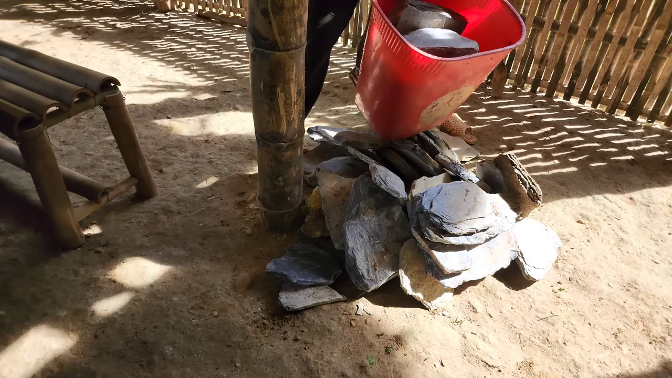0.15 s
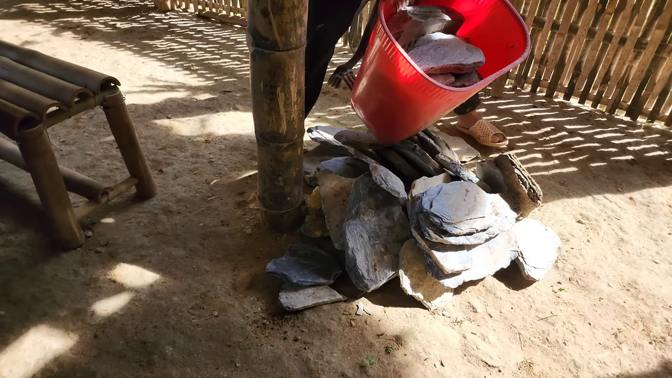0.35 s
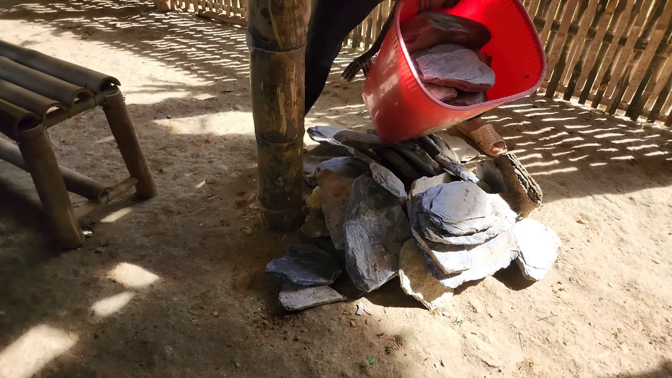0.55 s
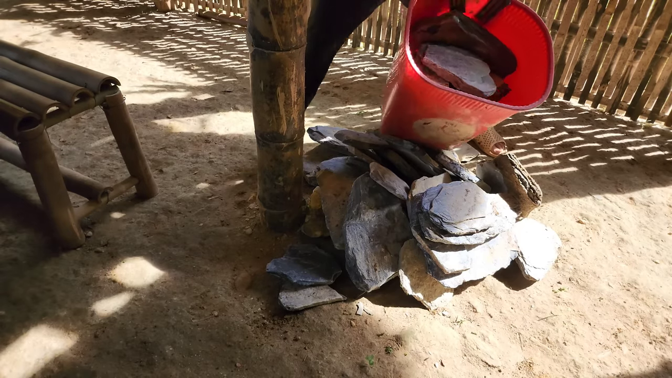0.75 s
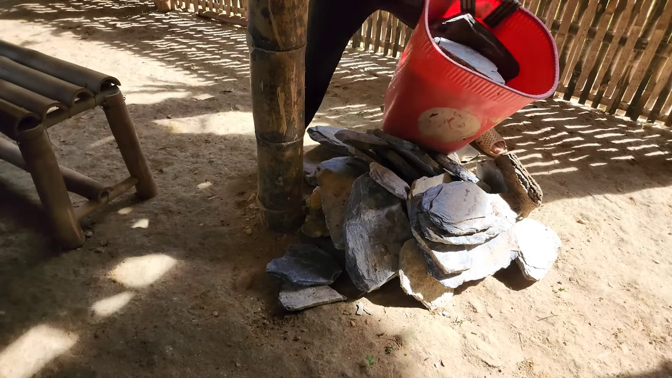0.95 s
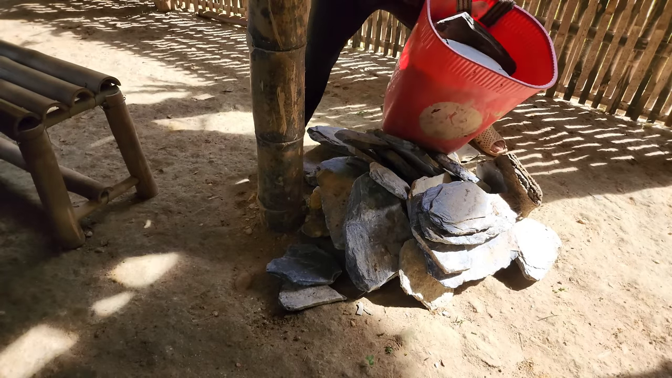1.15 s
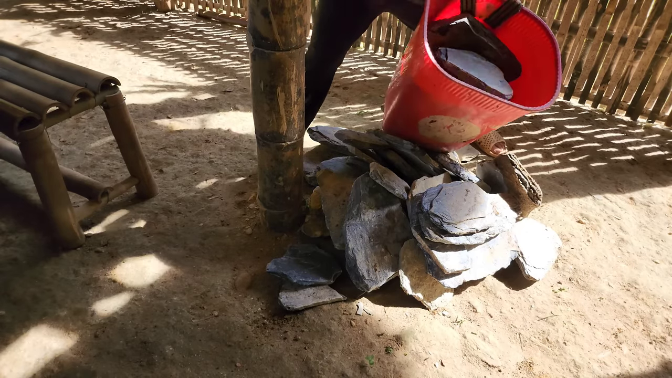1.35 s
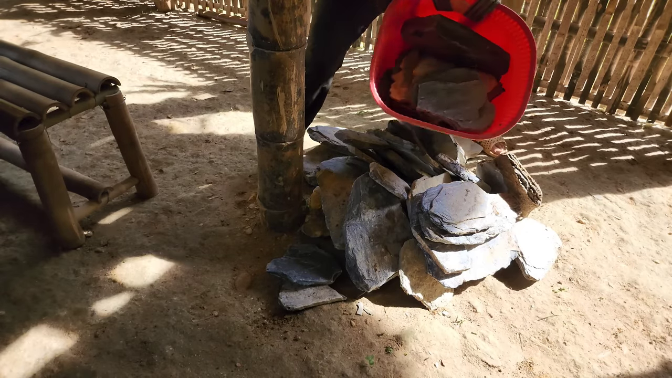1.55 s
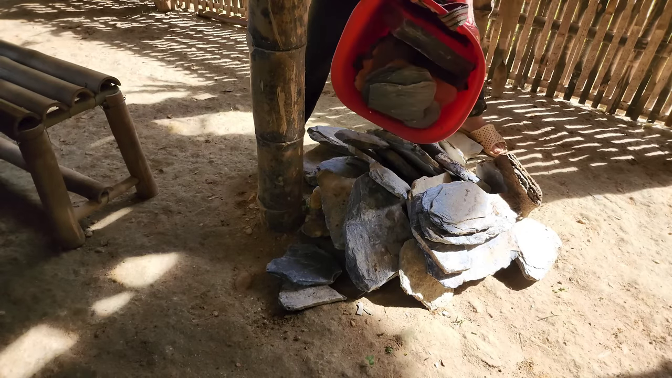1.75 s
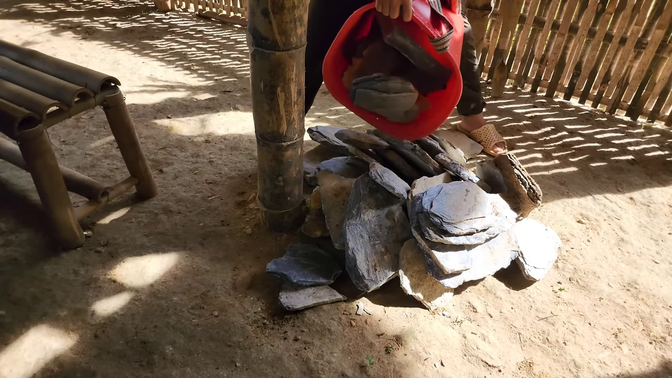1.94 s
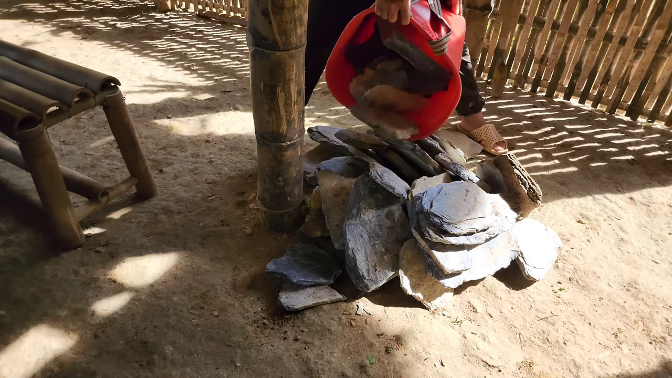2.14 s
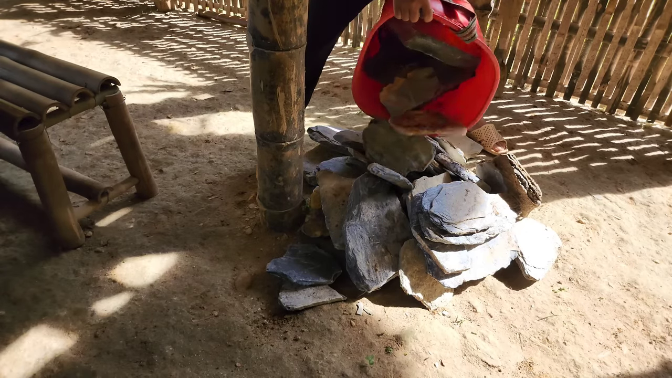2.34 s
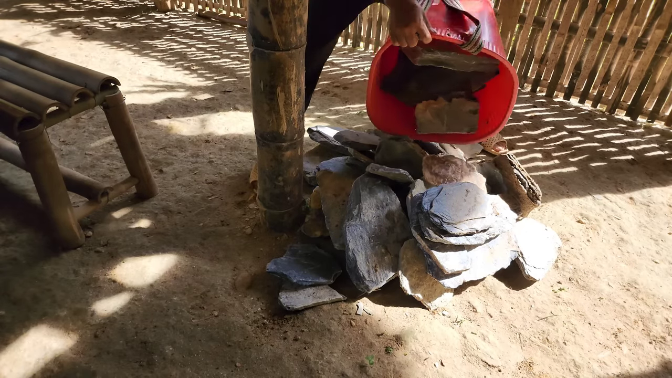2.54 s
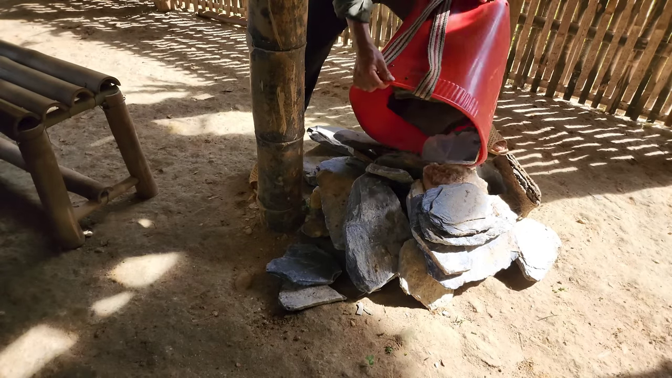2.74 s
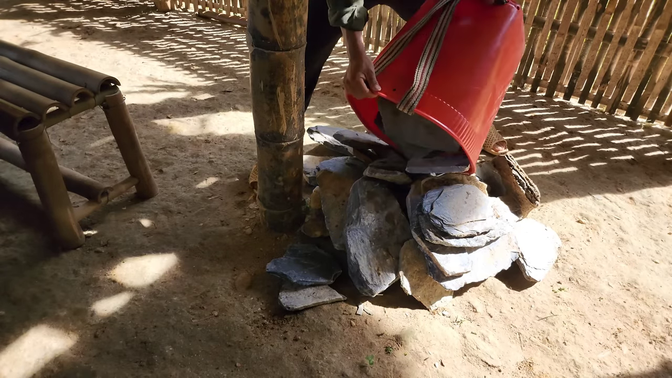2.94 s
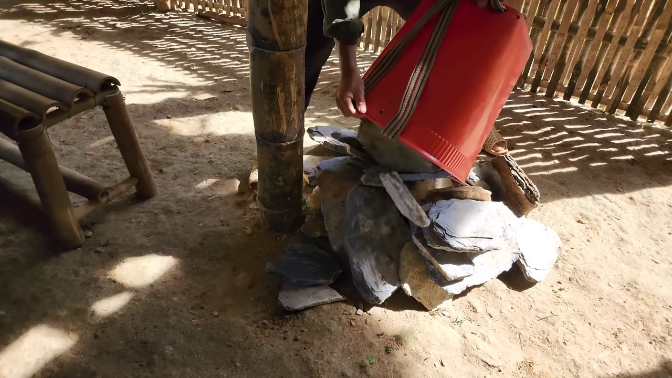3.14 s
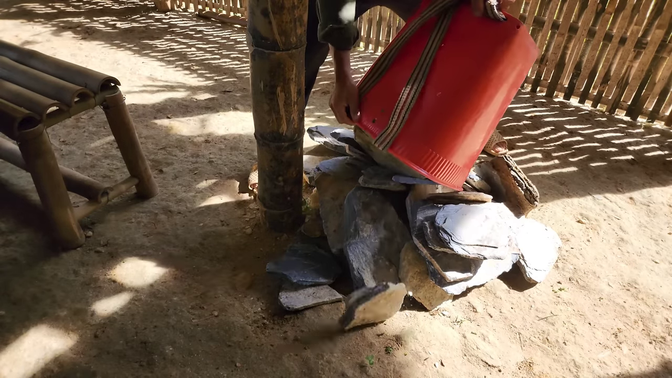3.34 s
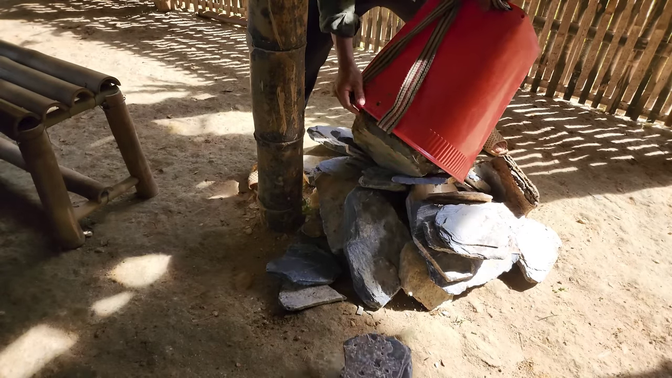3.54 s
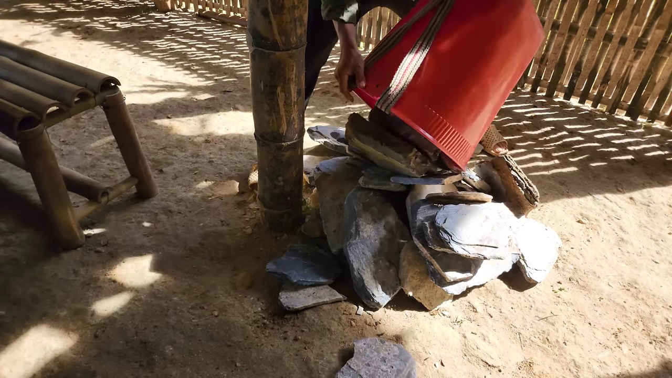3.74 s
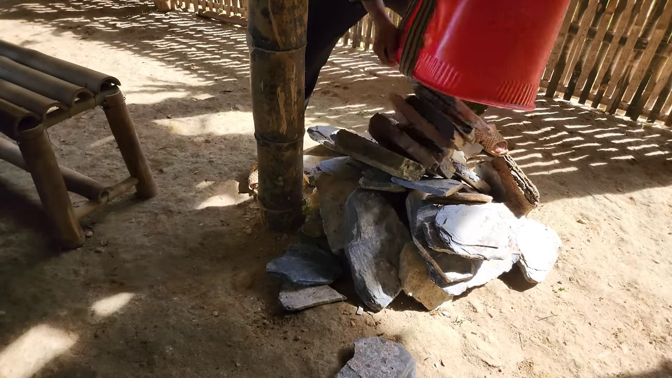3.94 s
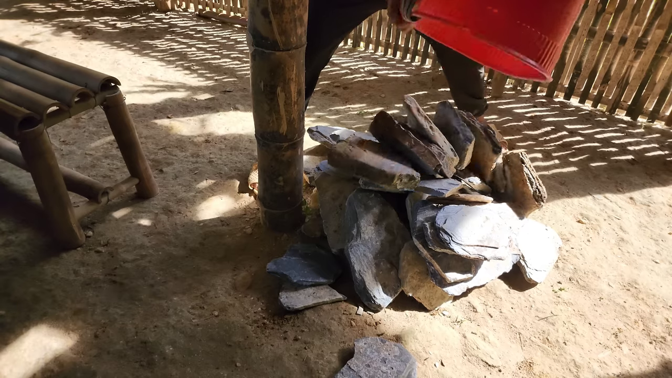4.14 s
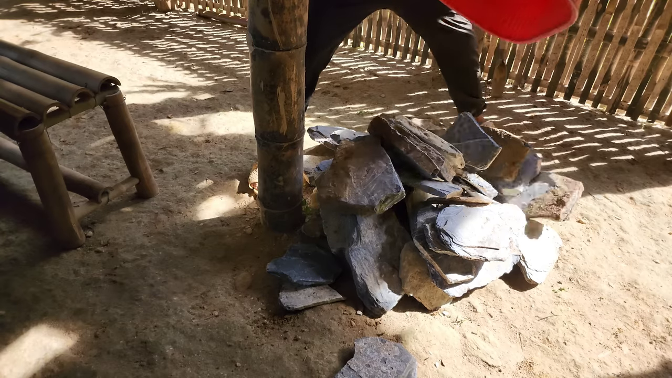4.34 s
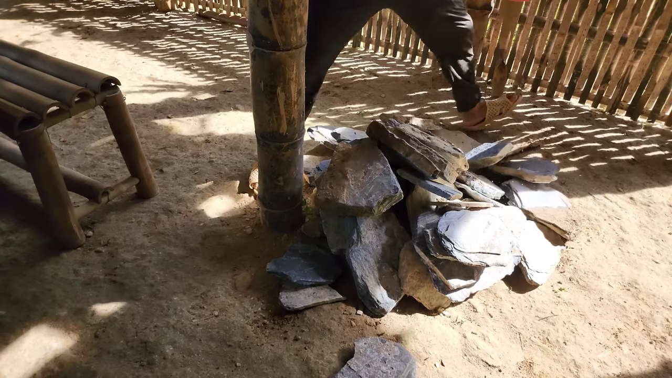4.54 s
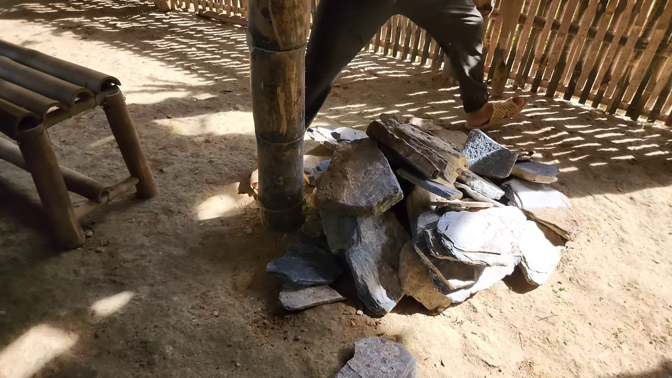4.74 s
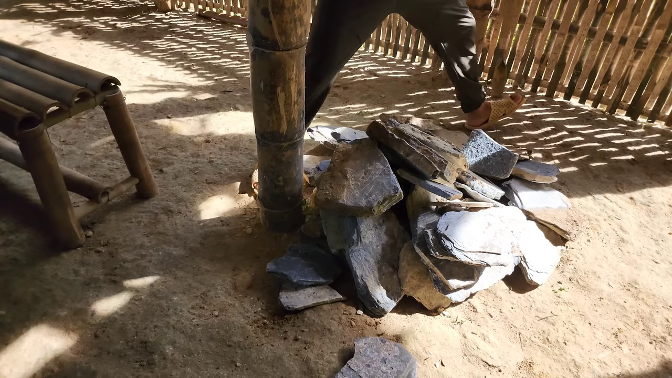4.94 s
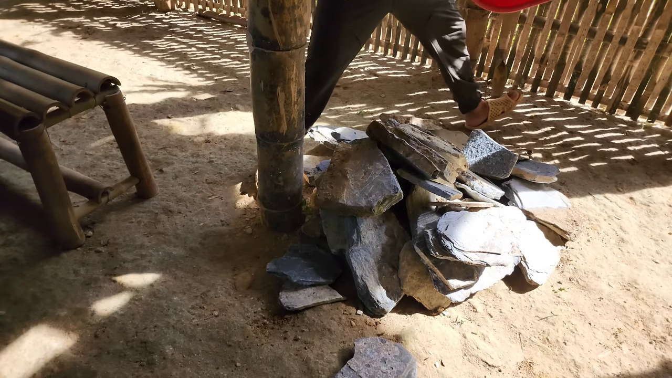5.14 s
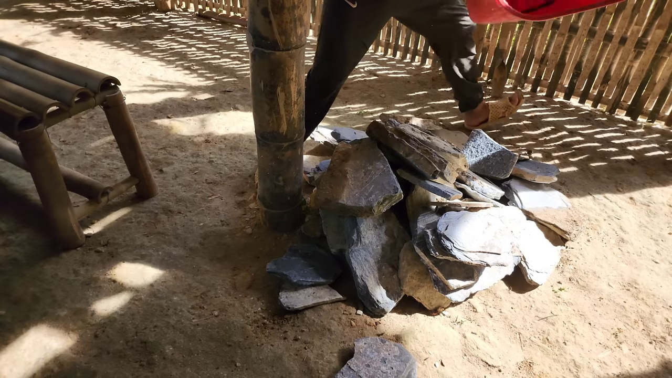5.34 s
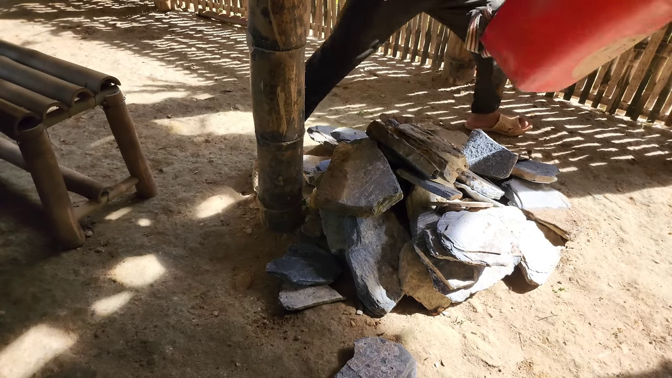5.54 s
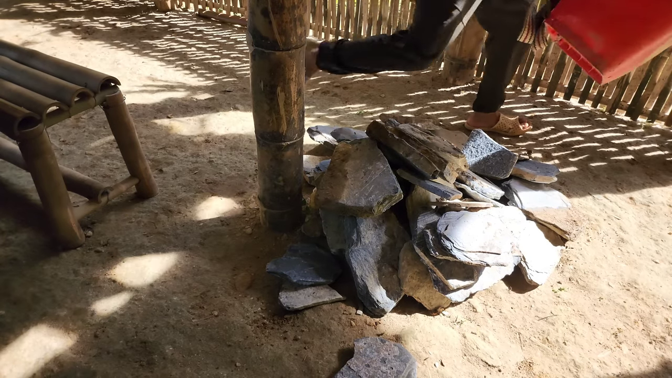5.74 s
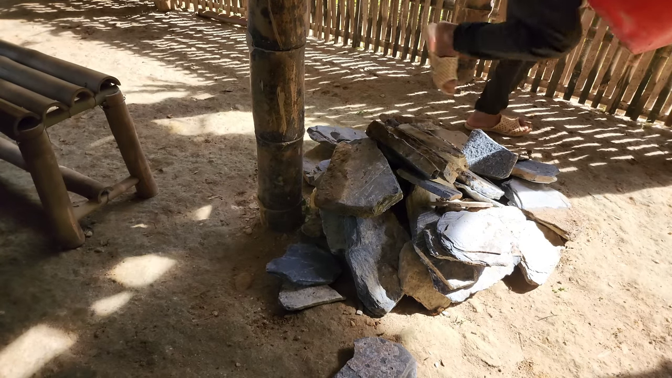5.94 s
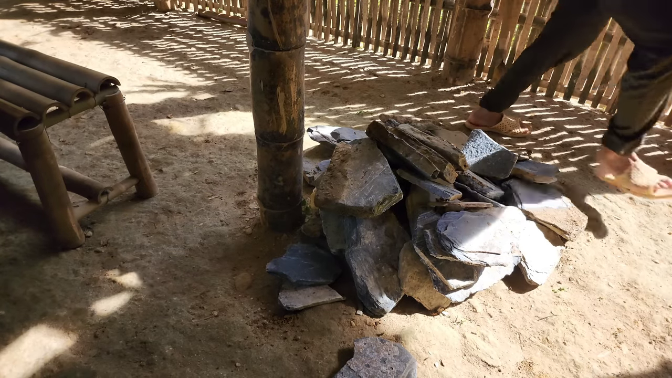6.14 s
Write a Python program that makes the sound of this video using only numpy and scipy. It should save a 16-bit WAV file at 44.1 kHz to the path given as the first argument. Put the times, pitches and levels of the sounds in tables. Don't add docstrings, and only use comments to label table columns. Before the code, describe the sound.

Flat stones shift, then tumble clattering from a booming plastic bucket onto a stone pile in a sandy yard, ending in faint scuffs.

```python
import sys
import numpy as np
from scipy import signal
from scipy.fft import rfft, irfft, next_fast_len
from scipy.io import wavfile
from scipy.ndimage import uniform_filter1d

SR = 44100
rng = np.random.default_rng(int(sys.argv[2]) if len(sys.argv) > 2 else 0)


def convert_level_to_amplitude(level_db):
    exponent = np.asarray(level_db, float) / 20
    return 10 ** exponent


def transcribe(signal):
    frames = np.atleast_2d(signal).T
    limited = np.clip(frames, -1, 1)
    pcm = np.round(limited * 32767).astype(np.int16)
    wavfile.write(sys.argv[1], SR, pcm)


N = 277006
BUCKET_LIFTED_S = 3.85

# start_s, peak_db, strongest_ring_hz, upper_modes_db, crack_db
SETTLING_BLOWS = [(0.181, -24.5, 730, -5, -18.5), (0.508, -31, 1427, 1, -18.5), (0.552, -23, 870, -20, -52),
                  (0.757, -6.5, 716, 4.5, -27.5), (0.802, -20.5, 960, -22, -44),
                  (0.841, -24.5, 564, -27, -37), (0.972, -20, 583, -14, -29),
                  (1.071, -20.5, 437, -8.5, -29), (1.122, -21.5, 920, -12, -26.5),
                  (1.236, -26.5, 746, -5, -30), (1.468, -29, 725, -9, -32), (1.579, -15, 678, -28, -23.5),
                  (1.599, -9, 644, -22, -42)]
TILTING_BLOWS = [(1.617, -5, 595, -3.5, -30.5), (1.636, -4.5, 580, -29.5, -31),
                 (1.664, -1, 667, -19.5, -33), (1.739, -9.5, 627, -30.5, -42.5),
                 (1.783, -16, 1460, -12, -30.5), (1.804, -10, 676, -34, -29.5),
                 (1.833, -10, 590, -11.5, -31), (1.874, -1.5, 1440, -9.5, -30),
                 (1.955, -13.5, 610, -8, -47), (1.986, -15, 645, -10, -33), (2.072, -12, 642, -8.5, -27),
                 (2.121, -15.5, 576, -17, -30), (2.162, -13.5, 635, -13, -37),
                 (2.265, -27.5, 483, -22, -38), (2.317, 0.5, 899, -7.5, -22), (2.378, -3, 714, -4, -31.5),
                 (2.404, -9, 1540, -12, -23), (2.493, -17, 515, -6, -29), (2.546, -16, 940, -10, -23)]
POURING_BLOWS = [(2.573, -7.5, 2386, -13, -23), (2.593, -6, 1494, -15.5, -20.5),
                 (2.639, -9, 2110, -19.5, -20.5), (2.686, -18.5, 1040, -36, -30),
                 (2.717, -17, 1020, 5, -35), (2.745, -17, 485, -20, -80), (2.776, -2, 545, -5, -30),
                 (2.852, -6, 2006, -9, -22.5), (2.910, -2, 2030, -12.5, -29), (2.935, -9, 514, -5.5, -10),
                 (2.978, -7, 2100, -7, -19), (3.022, -14.5, 550, -27.5, -26), (3.066, -1.5, 1156, -3, -39),
                 (3.104, -5, 1970, -3, -31), (3.169, -10.5, 976, 3, -28.5),
                 (3.233, -10.5, 1193, -6.5, -31.5), (3.275, -9, 1000, -1, -34),
                 (3.385, -14.5, 593, -13.5, -18.5), (3.448, -36.5, 1720, 20, -7.5),
                 (3.517, -28.5, 556, -5, -12.5), (3.548, -25, 540, -3, -13.5), (3.584, -27.5, 550, -5, -9),
                 (3.694, -30, 607, -12, -44)]
TUMBLING_BLOWS = [(3.801, -23.5, 512, -6, -29), (3.868, -19, 1240, -17, -29),
                  (3.896, -7.5, 1388, -12.5, -38.5), (3.955, -9.5, 2060, -10, -38.5),
                  (4.046, -18, 1366, -17, -59), (4.103, -26.5, 960, -28.5, -28),
                  (4.159, -6, 848, -7.5, -31), (4.210, -13, 1410, -16.5, -32),
                  (4.218, -2.5, 1437, -6.5, -38), (4.263, -4.5, 1896, -18, -23.5),
                  (4.352, -13.5, 1437, -4.5, -22), (4.423, -20.5, 860, -11.5, -33.5),
                  (4.464, -13.5, 822, -9, -33), (4.49, -3.5, 2100, -6.5, -30.5),
                  (4.518, -7, 1930, -13.5, -15.5), (4.539, -0.5, 1378, 1, -30), (4.631, -20, 953, -11, -34),
                  (4.745, -24, 884, -14, -29), (4.803, -15.5, 904, -14.5, -45),
                  (4.898, -44.5, 595, -39, -36)]
SANDAL_SCUFFS = [(5.181, -53.5, 560, -9, -18), (5.479, -47, 1127, -8, -18), (5.657, -54, 580, -38, -11),
                 (5.734, -40.5, 646, -5.5, -26), (5.843, -48, 1300, -6, -23.5),
                 (5.893, -47.5, 632, -8, -16), (5.922, -46, 632, -9, -19), (6.066, -41.5, 648, -19, -20.5),
                 (6.137, -48, 628, -7, -10.5)]
STONE_BLOWS = SETTLING_BLOWS + TILTING_BLOWS + POURING_BLOWS + TUMBLING_BLOWS + SANDAL_SCUFFS

# start_s, peak_db, strongest_note_hz
THUMPS_AND_STEPS = [(0.179, -28.5, 172), (0.624, -24.5, 158), (0.967, -23, 134), (1.074, -14, 211.8),
                    (1.628, -13.5, 214), (1.698, -23, 122), (1.739, -19, 177), (1.78, -12, 186.4),
                    (1.83, -8.5, 174), (1.985, -10.5, 174.4), (2.07, -10, 168), (2.281, -16.5, 182),
                    (2.335, -5, 210.3), (2.373, -5.5, 182.2), (1.958, -12.5, 178.4), (2.645, -6.5, 188.6),
                    (2.751, -11, 131), (2.792, -8, 155), (2.823, -12, 186), (2.904, -22, 134),
                    (3.008, -9, 174.5), (3.079, -6.5, 179.5), (3.189, -16, 142.4), (3.249, -13, 195.7),
                    (3.368, -23, 168), (3.524, -20.5, 176.6), (3.696, -19.5, 135.5), (3.794, -20.5, 188),
                    (3.886, -14.5, 183.6), (3.918, -18, 171.6),
                    (0.009, -55, 110), (0.846, -26, 197), (1.14, -26.5, 153), (5.478, -44.5, 155),
                       (5.658, -48, 159.4), (5.763, -33.5, 210), (5.899, -46, 213), (6.074, -42.5, 159.4)]
LOW_BLOWS = THUMPS_AND_STEPS

# frequency_hz, level_db (per Hz)
MIC_TREBLE = [(2060, -13.5), (3830, -8.5), (4900, -16), (7320, -15), (10500, -25), (11700, -17),
              (14800, -21.5), (16000, -31)]


def level(x, db):
    return x * convert_level_to_amplitude(db) / np.sqrt(np.mean(x ** 2))


def curve(table):
    s, *columns = np.transpose(table)
    return [np.interp(np.arange(N) / SR, s, c) for c in columns]


def colour(x, points):
    hz, db = np.transpose(points)
    n = next_fast_len(x.shape[-1])
    f = np.maximum(np.fft.rfftfreq(n, 1 / SR), 1)
    gain = convert_level_to_amplitude(np.interp(np.log(f), np.log(hz), db))
    return irfft(rfft(x, n) * gain, n)[..., :x.shape[-1]]


def resonate(x, hz, width_hz):
    return signal.lfilter(*signal.iirpeak(hz, hz / width_hz, fs=SR), x)


def both_ports(mid, side):
    return mid + side * np.array([[1], [-1]])


def pair(x, hz, chance, alike_hz=1000):
    spread = np.pi * np.tanh((hz / alike_hz / 2) ** 1.4) * chance
    return x[..., None] + np.array([.5, -.5]) * spread[..., None]


def walk(rate, count):
    k = int(SR / rate)
    held = np.repeat(rng.standard_normal((count, N // k + 1)), k, axis=1)
    return 1.3 * uniform_filter1d(uniform_filter1d(held, k), k)[:, :N]


def slips(rate, scatter_db, count):
    clicks = 1. * (rng.random((count, N)) < rate / SR)
    signs = rng.standard_normal((count, N))
    size_db = scatter_db * rng.standard_exponential((count, N)).clip(0, 6)
    return clicks * signs * convert_level_to_amplitude(size_db)


def add(out, s, sound, db, pan_db):
    i = int(s * SR)
    n = min(sound.shape[1], N - i)
    gain = convert_level_to_amplitude(db + np.array([[pan_db], [-pan_db]]) / 2)
    out[:, i:i + n] += sound[:, :n] / np.abs(sound).max() * gain


def ring(hz, db, t60, chance, contact_s, size):
    t = np.arange(size) / SR
    phase = pair(2 * np.pi * chance[0], hz, 2 * chance[1] - 1).T
    pole = np.exp((2j * np.pi * hz - np.log(1000) / t60) / SR)
    modes = np.cumprod(np.repeat(pole[:, None], size, axis=1), axis=1)
    build_up = 1 - np.exp(-(t / contact_s) ** 2)
    return ((convert_level_to_amplitude(db) * np.exp(1j * phase)) @ modes).imag * build_up


def aftermath(rows, db, t60):
    kicks = np.zeros(N)
    kicks[[int(row[0] * SR) for row in rows]] = [convert_level_to_amplitude(row[1] + db) ** 2 for row in rows]
    power = signal.lfilter([1], [1, -convert_level_to_amplitude(-120 / t60 / SR)], kicks)
    return uniform_filter1d(np.sqrt(power), 300)


def clacks(split_hz=1300, top_hz=5500, t60_s=0.024, main_t60_s=0.039, main_db=4, scatter_db=10):
    scuff_from_s, scuff_drag = 5, 1.2
    out, size = np.zeros((2, N)), 4000
    t = np.arange(size) / SR
    for s, db, hz, upper_db, crack_db in STONE_BLOWS:
        chatter_s = 0.025 * (700 / hz) ** 0.045 * (scuff_drag if s > scuff_from_s else 1)
        chance = rng.random((5, 40))
        noise = rng.standard_normal((3, size))
        dying = np.exp(-(t / np.clip(chatter_s, .002, .06)) ** 2)
        contacts = (rng.random(size) < 600 / SR) * noise[2] * dying
        contacts[0] = 2.6 if s < scuff_from_s else .5

        notes = np.r_[hz, 450 * (top_hz / 450) ** ((np.arange(39) + chance[2, 1:]) / 39)]
        tilt_db = (upper_db + 11.5) * (1 + np.tanh(2 * np.log2(notes / split_hz))) / 2
        tilt_db -= 16 * np.maximum(np.log2(notes / 2500), 0)
        tilt_db -= 7 * np.maximum(np.log2(hz / notes) - .6, 0)
        pile_loss_db = 10 * np.maximum(np.log2(750 / notes), 0) + 7 * (notes > 2500)
        tilt_db -= (s > BUCKET_LIFTED_S) * pile_loss_db
        gain_db = tilt_db + np.r_[main_db, -scatter_db * chance[3, 1:]]
        crowd_t60_s = t60_s * (1.2 - .5 * chance[3, 1:]) * (1500 / notes[1:]) ** .6
        body = ring(notes, gain_db, np.r_[main_t60_s, crowd_t60_s], chance, 0.00055, size=2800)
        pan_db = 5 * (chance[4, 0] - .5)
        clack = signal.fftconvolve(body, contacts[None])[:, :2 * size]
        add(out, s - .001, clack, db + 0.5, pan_db)

        patches = np.c_[np.linspace(2000, 16000, 140), 3 * rng.exponential(size=140).clip(0, 5)]
        crack_decay = convert_level_to_amplitude(-60 * t / 0.044) + 0.12 * convert_level_to_amplitude(-60 * t / 0.067)
        puffs = np.sqrt(signal.fftconvolve(contacts ** 2, crack_decay)[:size].clip(0))
        crack = colour(colour(noise[:2], MIC_TREBLE), patches) * puffs * np.tanh(t / 0.0015)
        add(out, s - .001, crack, db + crack_db + 9.5, pan_db)
    return out


def thumps():
    out = np.zeros((2, N))
    mode_db = np.array([1.5, -12.5, -6.0, -17.5])
    mode_t60_s = 0.17 * np.array([0.96, 0.38, 0.97, 1.0])
    for s, db, hz in LOW_BLOWS:
        chance = rng.random((2, 4))
        notes = hz * np.array([1, 1.5, .66, 1.5])
        boom = ring(notes, mode_db, mode_t60_s, chance, 0.0082, size=9000)
        add(out, s - .004, boom, db, 0)
    return out


def slab():
    # start_s, peak_db
    slab_blows = [(1.6214, -9), (1.638, -12), (1.667, -14.5), (1.933, -27), (2.1247, -29), (2.2394, -30.5),
                  (2.269, -26), (2.349, -25.5), (2.784, -10), (3.0786, -19.5), (3.1066, 0), (3.1503, -14.5),
                  (3.2124, -27.5), (3.248, -21)]
    slab_hz, slab_db, t60_s = np.array([2984, 3370, 7300]), np.array([0, -8, -24]), np.full(3, 0.055)
    out = np.zeros((2, N))
    for s, db in slab_blows:
        chance = rng.random((2, 3)) * [[1], [.5]] + [[0], [.25]]
        notes = slab_hz * (1 + 0.019 * (chance[0] - .5))
        add(out, s - .001, ring(notes, slab_db, t60_s, chance, 0.0025, size=8000), db, 0)
    return out


def clinks():
    # start_s, peak_db, pitch_hz
    clear_rings = [
        (2.408, -13, 2376),
        (3.278, -3, 1294),
        (3.96, -22, 3530),
        (4.018, -22.5, 1444),
        (4.164, -23, 3880),
    ]
    out = np.zeros((2, N))
    for s, db, hz in clear_rings:
        chance = rng.random((2, 1))
        clink = ring(np.array([hz]), np.zeros(1), np.array([.035]), chance, 0.0026, size=6000)
        add(out, s, clink, db, 0)
    return out


def slide():
    # time_s, sliding_speed_db, wall_drag_db
    load_motion = [(0, -55, -35), (0.15, -58.5, -62.5), (0.74, -51.5, -42.5), (1.22, -47, -39),
                   (1.3, -67, -65.5), (1.54, -41, -36), (1.7, -30.5, -19.5), (2.04, -44.5, -38.5),
                   (2.15, -42.5, -25.5), (2.68, -39.5, -44), (2.95, -24, -21), (3.2, -26.5, -31),
                   (3.48, -60.5, -43), (3.65, -62, -40), (3.86, -46.5, -37.5), (4.56, -35.5, -43.5),
                   (4.86, -63, -57.5), (4.93, -70.5, -65)]
    # mode_hz, width_hz, level_db
    load_modes = [(635, 160, 8.5), (1000, 24, 4.5), (1300, 450, 3), (1580, 280, 1.5), (2100, 33, 6),
                  (2357, 18, 1.5), (3000, 26, -1), (3390, 120, -4)]
    # mode_hz, width_hz, level_db
    high_modes = [(4430, 22, -6), (5372, 47.7, -4.5), (6550, 130, -5), (7280, 120, -4), (8470, 20, -17)]
    # mode_hz, width_hz, level_db
    wall_modes = [(110, 15, -1), (162.1, 57, 0.5), (204, 46, -1.5), (332, 24, -8.5)]
    speed_db, drone_db = curve(load_motion)
    debris = aftermath(STONE_BLOWS, -29.5, .4)
    rocking = aftermath(LOW_BLOWS, -10, 0.35)
    buried = np.arange(N) > BUCKET_LIFTED_S * SR
    grind_db = 20 * np.log10(np.hypot(convert_level_to_amplitude(speed_db), debris))
    grit_db = -50.5 + 0.79 * (grind_db + 44.5) - 6.5 * buried
    flutter_db = 2.5 * walk(30, count=3)

    grind = 0
    for hz, width_hz, db in load_modes:
        mid, side = resonate(resonate(slips(1000, 2.4, count=2), hz, 1.3 * width_hz), hz, 700)
        mode_db = db - 5 * buried * (hz > 2800)
        grind = grind + convert_level_to_amplitude(mode_db) * both_ports(mid, min(hz / 2200, 1) * side)

    grains = slips(12000, 1.5, count=2)
    chime = sum(convert_level_to_amplitude(db) * resonate(resonate(grains, hz, 2.1 * w), hz, 400) for hz, w, db in high_modes)
    grit = level(colour(grains, MIC_TREBLE), -1.8) + level(chime, -13)

    push = slips(300, 1.1, count=2)
    mid, side = sum(convert_level_to_amplitude(db) * resonate(resonate(push, hz, 1.2 * w), hz, 1.2 * w) for hz, w, db in wall_modes)
    drone = level(both_ports(mid, 0.13 * side), -0.11)

    stones = level(grind, 0.044) * convert_level_to_amplitude(grind_db + flutter_db[0])
    hiss = grit * convert_level_to_amplitude(grit_db + flutter_db[0] + .5 * flutter_db[1])
    return stones + hiss + drone * np.hypot(convert_level_to_amplitude(drone_db), rocking) * convert_level_to_amplitude(flutter_db[2])


def rub():
    # time_s, level_db
    drag_levels = [
        (1.091, -44),
        (1.12, -33.5),
        (1.15, -39),
        (1.167, -31),
        (1.21, -64),
        (1.23, -76),
    ]
    # mode_hz, width_hz, level_db
    rubbed_modes = [(960, 29, 1.5), (1540, 58, -6), (2055, 82, -9), (2770, 73, -17), (3570, 80, -16),
                    (4550, 70, -14), (5580, 75, -24), (6570, 60, -24)]
    drag = slips(1400, 0.98, count=2)
    mid, side = sum(convert_level_to_amplitude(db) * resonate(resonate(drag, hz, 1.5 * w), hz, 3 * w) for hz, w, db in rubbed_modes)
    db = curve([(0, -200), *drag_levels, (drag_levels[-1][0] + .01, -200)])[0]
    touching = np.arange(N) / SR > drag_levels[0][0]
    return level(both_ports(mid, 0.68 * side), 0) * convert_level_to_amplitude(db) * touching


def rings():
    # start_s, peak_db, pitch_hz, rocking_s
    load_rings = [(1.548, -37.5, 1500, 0.01), (1.681, -19.5, 1435, 0.014), (1.699, -23, 990, 0.015),
                  (1.715, -25, 1970, 0.016), (1.771, -16.5, 1520, 0.013), (1.772, -29.5, 2410, 0.012),
                  (1.785, -13, 1010.0, 0.01), (1.79, -23.5, 3340, 0.01), (1.8, -26, 2440, 0.012),
                  (1.846, -15.5, 1017, 0.0087), (1.845, -14, 1540, 0.0036), (1.848, -29, 3460, 0.01),
                  (1.88, -31.5, 2593, 0.018), (1.98, -32, 2450, 0.018), (2.086, -26.5, 1540, 0.031),
                  (2.148, -29.5, 3430, 0.008), (2.345, -24.5, 3390.0, 0.015), (2.405, -27, 4290, 0.012),
                  (2.551, -30, 2270, 0.0066), (2.585, -22, 2320, 0.014), (2.595, -14, 1700, 0.0066),
                  (2.617, -40, 3460, 0.011), (2.645, -30, 4220, 0.006), (2.65, -35, 2300, 0.0081),
                  (2.688, -30, 2390.0, 0.0069), (2.72, -33.5, 2410, 0.0088), (2.746, -22, 1190, 0.027),
                  (2.767, -31, 3580, 0.0098), (2.894, -17, 1230, 0.019), (2.908, -13.5, 1810, 0.01),
                  (2.936, -16, 2030, 0.012), (2.98, -17.5, 1760, 0.0085), (3.021, -27.5, 1350, 0.012),
                  (3.056, -10, 1160, 0.016), (3.066, -11.5, 2150, 0.018), (3.16, -25, 900, 0.026),
                  (3.189, -15.5, 1223, 0.011), (3.25, -15.5, 1150, 0.013)]
    pile_rings = [(4.144, -26.5, 1300, 0.03), (4.199, -33, 3440, 0.032), (4.27, -24, 2950, 0.0072),
                  (4.268, -27, 3900, 0.0074), (4.384, -25, 1430, 0.0049), (4.429, -29, 1840.0, 0.006),
                  (4.487, -12.5, 1140, 0.0042), (4.485, -9, 1640, 0.0059), (4.549, -12, 1750, 0.012),
                  (4.545, -23, 3000, 0.0069), (4.57, -36, 3200, 0.018), (4.593, -24.5, 820, 0.0069),
                  (4.6, -27, 1840, 0.0073), (4.7, -36, 2160, 0.02), (4.712, -46, 4020, 0.014),
                  (4.716, -50, 3150.0, 0.012), (4.73, -39, 2100, 0.012), (4.751, -29.5, 1410, 0.0083),
                  (4.76, -45, 3280, 0.012), (4.775, -41, 2150, 0.02), (4.804, -21.5, 1673, 0.011),
                  (4.805, -43.5, 4830, 0.012)]
    hollow_rings = [(0.005, -37.5, 278, 0.021), (1.617, -18, 273, 0.011), (1.661, -21, 260.0, 0.015),
                    (1.802, -14, 343, 0.013), (2.073, -28, 333, 0.016), (2.429, -21.5, 350, 0.0068),
                    (2.645, -24.5, 360, 0.014), (2.776, -19, 385, 0.029), (2.831, -30, 397, 0.0096),
                    (2.934, -15.5, 503, 0.012), (3.009, -19, 300, 0.009), (3.379, -39, 280, 0.008),
                    (4.798, -33.5, 336, 0.011), (5.655, -48.5, 266.7, 0.016), (5.736, -48, 296, 0.012),
                    (5.798, -51, 223, 0.015), (5.868, -48, 215.3, 0.012), (5.93, -53, 238, 0.014),
                    (5.981, -53, 220.0, 0.016), (6.061, -50, 286, 0.01), (6.2, -58, 260, 0.011)]
    stray_rings = [(0.02, -41, 625, 0.0089), (0.219, -36, 210, 0.024), (0.279, -44, 1820, 0.0029),
                   (0.386, -50, 1380, .01), (0.438, -45, 1470, 0.0055), (0.552, -32, 400, 0.0037),
                   (0.635, -33, 566, 0.0095), (0.773, -20, 674, 0.005), (0.86, -36, 597, 0.0084),
                   (3.301, -32, 1840, 0.018), (3.388, -22, 2670, 0.0029), (3.452, -42, 3370, .005),
                   (3.87, -24.5, 1770, 0.0095), (3.88, -37, 3000, 0.0085), (3.9, -16.5, 2043, 0.019),
                   (3.9, -36.5, 4050, 0.021), (4.264, -13, 1860, 0.018), (5.14, -65, 2370, 0.018)]
    out, t = np.zeros((2, N)), np.arange(4000) / SR
    for s, db, hz, rocking_s in load_rings + pile_rings + hollow_rings + stray_rings:
        chance, luck = rng.random((2, 3)), rng.random((2, len(t)))
        dying = np.exp(-(t / max(1.4 * rocking_s, .002)) ** 2)
        knocks = (luck[0] < 1500 / SR) * (2 * luck[1] - 1) * dying
        knocks[0] = 1
        chance[1] = .2 + .6 * chance[1]
        notes = hz * np.array([1, 1.06, .93])
        t60_s = np.full(3, .026 + 8 / hz)
        mode = ring(notes, np.array([0, -7, -8]), t60_s, chance, 0.0029, size=6000)
        add(out, s - .001, signal.fftconvolve(mode, knocks[None]), db + 0.5, 0)
    return out


def ticks(t60_s=0.04):
    # start_s, peak_db
    grit_cracks = [(1.472, -46.5), (1.662, -16.5), (1.789, -31.5), (2.462, -31), (2.517, -37.5),
                   (2.827, -23.5), (2.890, -23), (2.921, -20), (3.003, -32.5), (3.096, -27), (3.171, -29.5),
                   (3.335, -45), (3.735, -52.5)]
    out, t = np.zeros((2, N)), np.arange(3000) / SR
    for s, db in grit_cracks:
        noise = rng.standard_normal((3, len(t)))
        snaps = convert_level_to_amplitude(4 * uniform_filter1d(noise[2], 30) * np.sqrt(30))
        envelope = snaps * convert_level_to_amplitude(-60 * t / t60_s) * np.tanh(t / .001)
        add(out, s - .001, colour(noise[:2], MIC_TREBLE) * envelope, db + 8, 0)
    return out


def ground():
    # time_s, level_db
    rumble_levels = [(0.0, -36), (0.07, -75), (1.1, -50), (1.38, -93), (1.7, -35), (2.17, -51.5),
                     (4.65, -43), (5.16, -76), (6.28, -81)]
    mid, side = resonate(resonate(rng.standard_normal((2, N)), 71, 41), 43, 66)
    return level(both_ports(mid, 0.14 * side), 0) * convert_level_to_amplitude(curve(rumble_levels)[0])


def bird():
    # start_s, peak_db
    chirp_starts = [
        (5.032, -50),
        (5.952, -47.5),
    ]
    # time_s after its start, pitch_hz, level_db
    chirp_shape = [(0, 4700, -12), (.02, 4630, -4), (.05, 4600, -6), (.062, 4100, -6), (.09, 3700, 0),
                   (.105, 3300, -4), (.13, 3100, -20)]
    out = np.zeros((2, N))
    s, hz, db = np.transpose(chirp_shape)
    t = np.arange(int(s[-1] * SR)) / SR
    smear = signal.butter(2, 110, fs=SR, output="sos")
    for start, peak_db in chirp_starts:
        tone = np.sin(2 * np.pi * np.cumsum(np.interp(t, s, hz)) / SR) * convert_level_to_amplitude(np.interp(t, s, db))
        hoarse = signal.sosfilt(smear, rng.standard_normal((2, len(t))))
        rasp = 1 + np.tanh(t / .06) ** 4 * 1.5 * np.sin(2 * np.pi * 330 * t)
        add(out, start, tone * hoarse * rasp, peak_db, 0)
    return out


def air():
    # frequency_hz, level_db (per Hz)
    air_spectrum = [(20, -30), (92, 3), (427, -19.5), (4740, -23.5), (5880, -27.5), (7310, -23.5),
                    (10400, -38), (14800, -32.5)]
    mid, side = colour(rng.standard_normal((2, N)), air_spectrum) * convert_level_to_amplitude(walk(4, count=1))
    mid = mid + 0.5 * resonate(mid, 4720, 120)
    side = colour(side, [(100, -3.5), (700, 4.0), (3000, 0.5)])
    return level(both_ports(mid, side), -62)


def yard(x, wet_db=-15):
    t = np.arange(int(.2 * SR)) / SR
    tail = colour(rng.standard_normal((2, len(t))), [(150, -29), (600, 3.5), (3500, 5.0), (12000, -19.0)])
    tail *= convert_level_to_amplitude(-60 * t / .12) * (t > .003)
    tail /= np.sqrt(np.sum(tail ** 2, axis=1, keepdims=True))
    return x + convert_level_to_amplitude(wet_db) * signal.fftconvolve(x, tail, axes=1)[:, :N]


def scene():
    stones = clacks() + thumps() + slab() + clinks() + slide() + rub() + rings() + ticks()
    return yard(stones + bird()) + ground() + air()


def roll_off(x):
    return signal.sosfilt(signal.butter(12, 16510, fs=SR, output="sos"), x)


def record(dry):
    rumble_free = signal.sosfilt(signal.butter(2, 38, "high", fs=SR, output="sos"), dry)
    rounded = 1.2 * np.tanh(rumble_free / 1.2)
    cut = signal.sosfilt(signal.ellip(8, .2, 60, 15300, fs=SR, output="sos"), rounded)
    return roll_off(cut)


dry = scene()
out = record(dry)
transcribe(out)
```